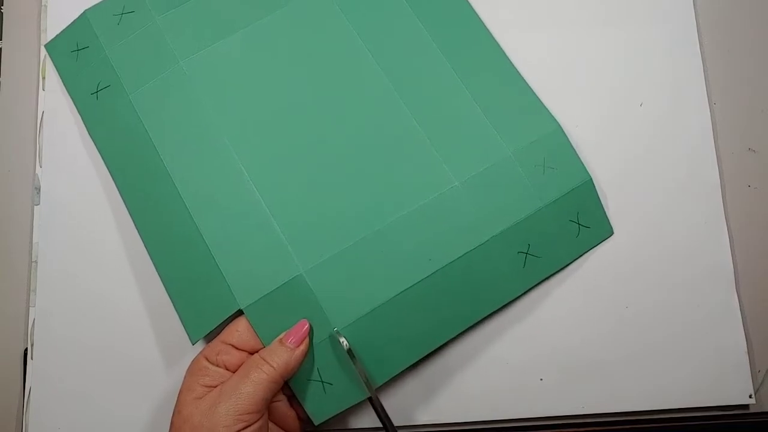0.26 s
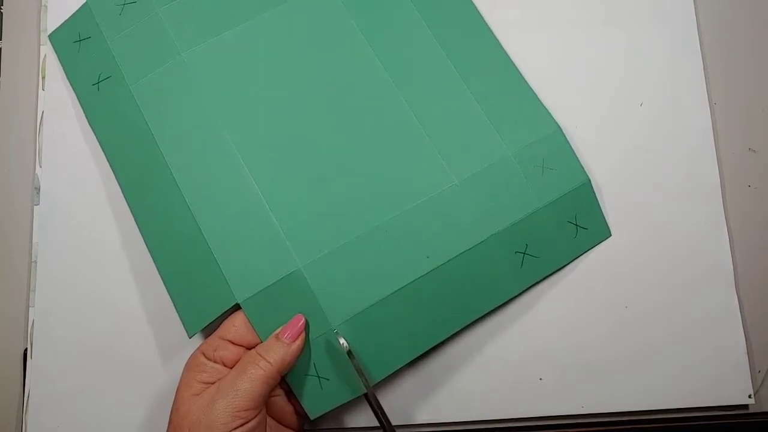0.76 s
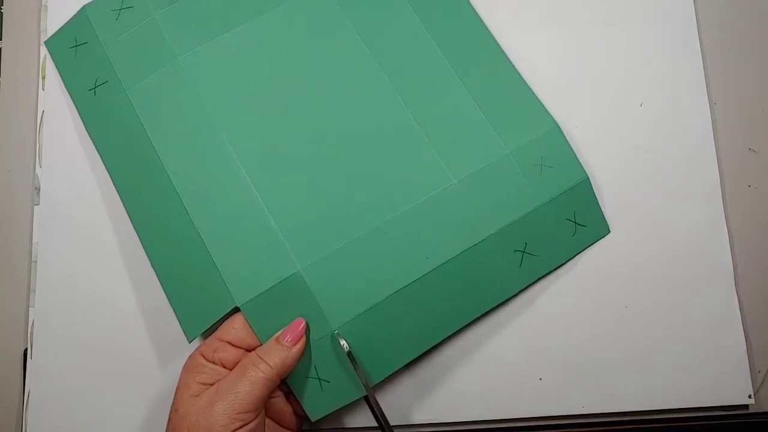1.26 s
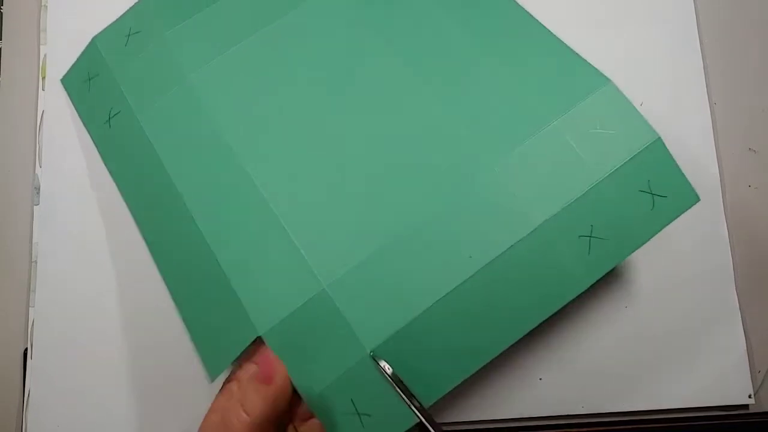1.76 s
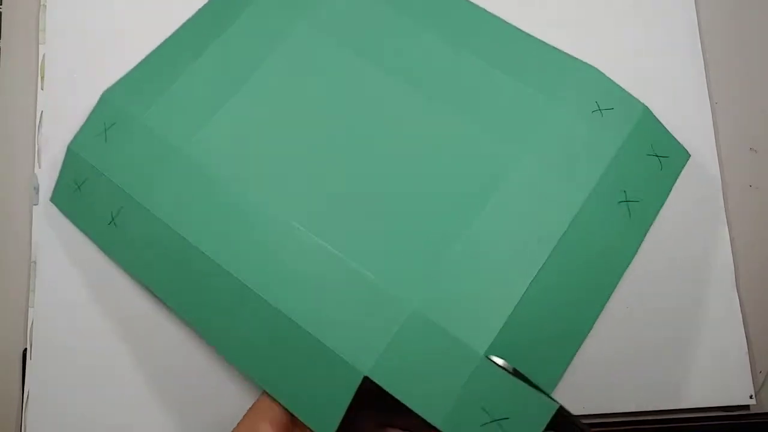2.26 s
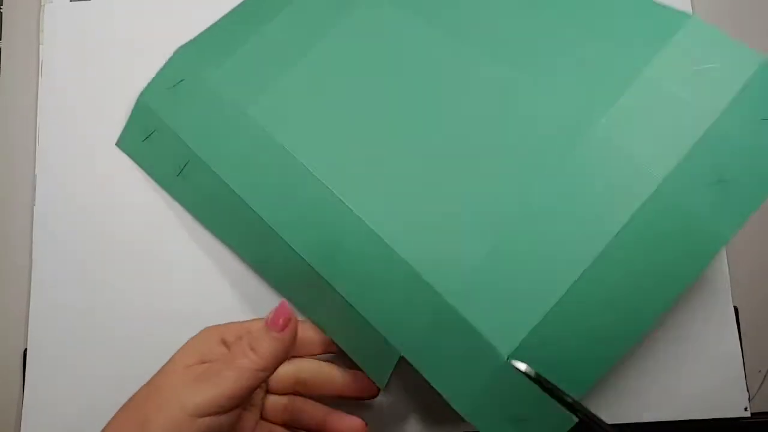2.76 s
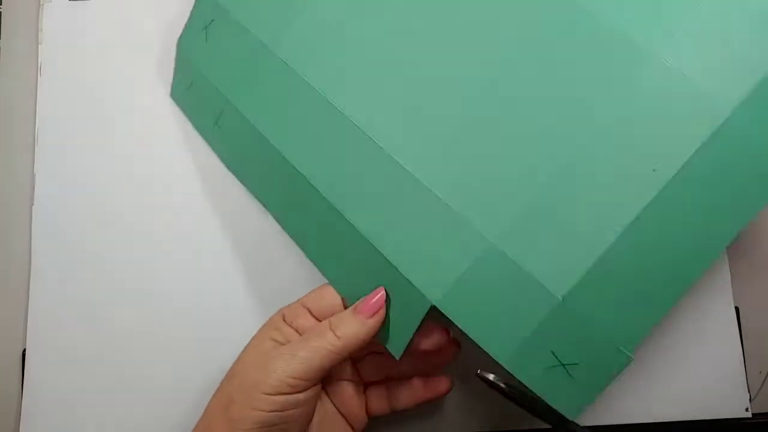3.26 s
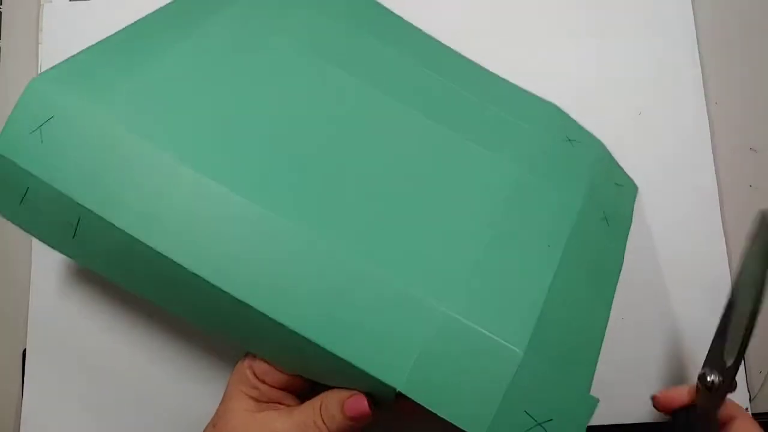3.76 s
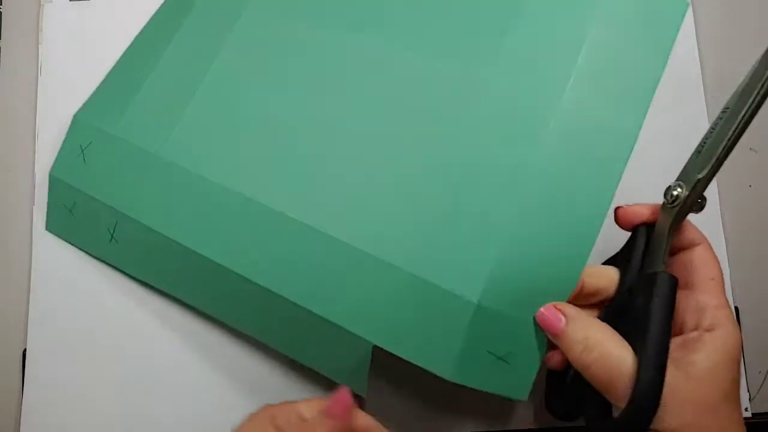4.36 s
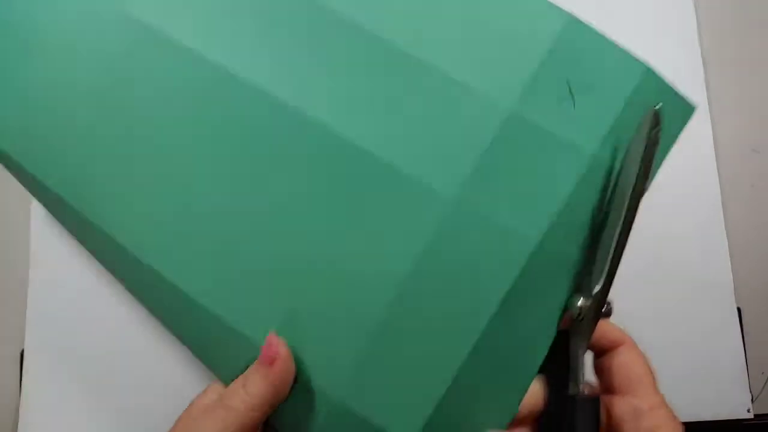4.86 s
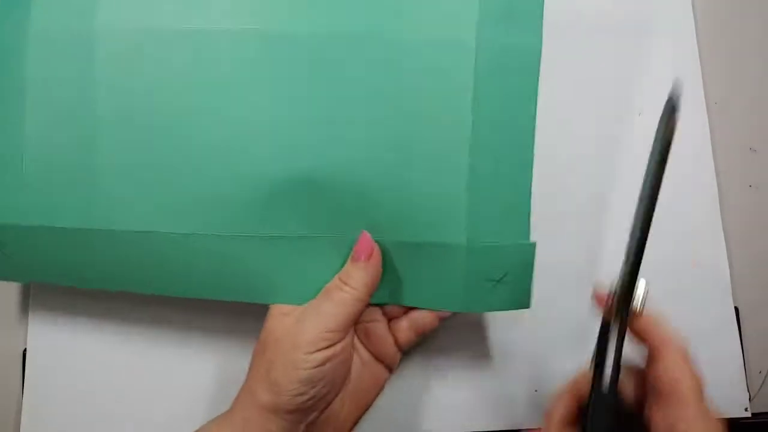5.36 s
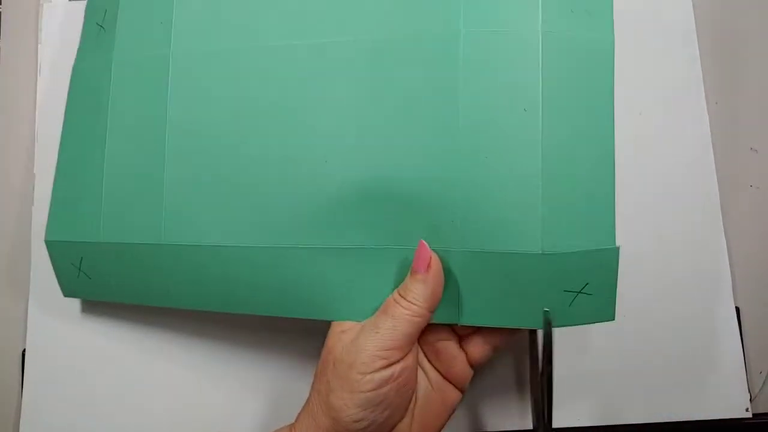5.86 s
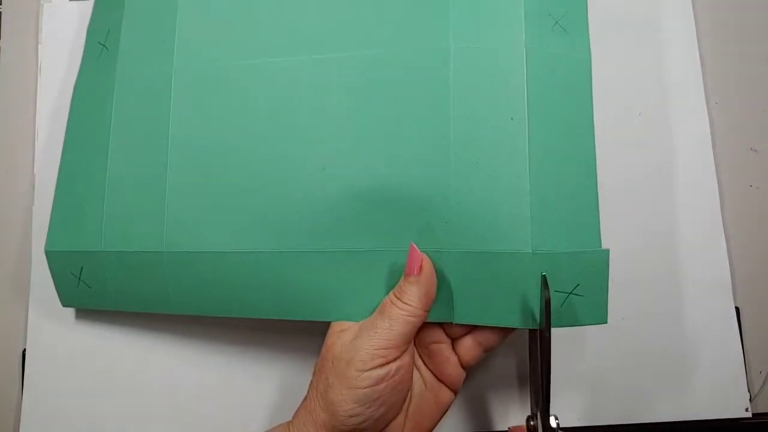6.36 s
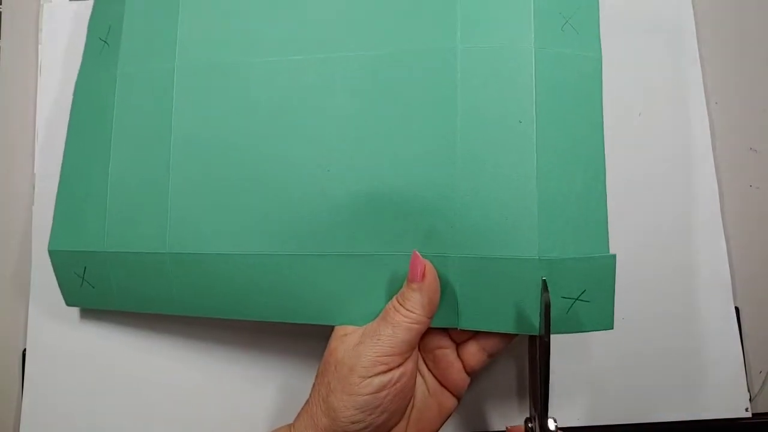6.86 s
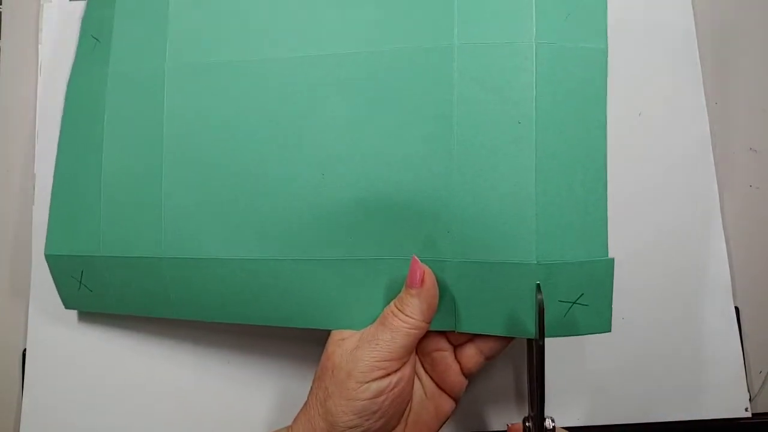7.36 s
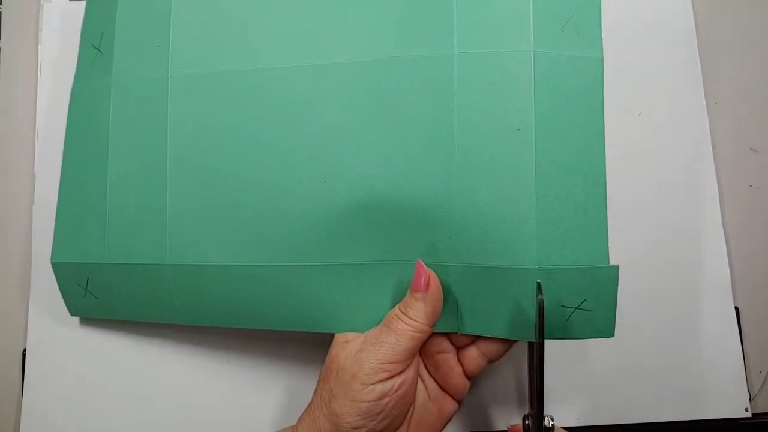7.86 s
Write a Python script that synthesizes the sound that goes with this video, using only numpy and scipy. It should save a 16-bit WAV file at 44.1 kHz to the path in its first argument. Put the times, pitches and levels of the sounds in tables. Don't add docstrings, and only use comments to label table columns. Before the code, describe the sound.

Close, bright handling of a stiff card sheet: rustles, scraping turns, crisp scissor snaps, light bumps on a table, then near quiet.

```python
import sys
import numpy as np
from scipy import signal
from scipy.fft import rfft, irfft
from scipy.io import wavfile
from scipy.ndimage import uniform_filter1d

SR = 44100
rng = np.random.default_rng(int(sys.argv[2]) if len(sys.argv) > 2 else 0)


def nominal_scale(level):
    x = np.asarray(level, float) / 20
    return 10 ** x


def file_out(sig):
    cols = np.atleast_2d(sig).T
    lim = np.clip(cols, -1, 1)
    pcm = np.round(lim * 32767).astype(np.int16)
    wavfile.write(sys.argv[1], SR, pcm)


N = 357651


def evened(x):
    return x / np.sqrt(np.mean(x ** 2) + 1e-20)


def add(mix, s, sound):
    part = mix[max(round(s * SR), 0):][:len(sound)]
    part += sound[:len(part)]


def coloured(x, points):
    f, db = np.transpose(points)
    hz = np.fft.rfftfreq(len(x), 1 / SR)
    curve_db = np.interp(np.log(hz + 1), np.log(f), db, -90, -90)
    return evened(irfft(rfft(x) * nominal_scale(curve_db), len(x)))


def resonate(x, hz, width_hz):
    turn = np.exp(2j * np.pi * np.cumsum(hz * np.ones(len(x))) / SR)
    r = np.exp(-np.pi * width_hz / SR)
    smooth = signal.lfilter([1 - r], [1, -r], x / turn)
    return 2 * (turn * smooth).real


def wander(per_s):
    r = np.exp(-2 * np.pi * per_s / SR)
    return evened(signal.lfilter([1], np.convolve([1, -r], [1, -r]), rng.standard_normal(N)))


def swell(rise, t60):
    rise, t60 = np.clip(rise, .0005, .08), np.clip(t60, .01, .5)
    t = np.arange(round((rise + t60) * SR)) / SR
    return np.sin(np.pi / 2 * np.minimum(t / rise, 1)) ** 2 * nominal_scale(-60 * np.maximum(t - rise, 0) / t60)


# start in seconds, tick level in dB, tick pitch in Hz,
# echo level in dB re tick, level of the knock in the sheet in dB re tick.
SNAPS = [(0.4933, -45.5, 7550, 2.5, -22), (.845, -30, 6240, -9, -25), (0.9036, -44, 6200, -14, -13),
         (1.3935, -5.5, 6100, -7.5, -20), (1.9665, -24.5, 7930, -17, -17), (3.1194, -24, 8250, -7, -24),
         (3.4157, -36, 6590, -3, -32), (3.4288, -10, 7900, -13.5, -49.5), (3.4442, -27, 4460, -3.5, -35),
         (3.4763, -32, 2500, -5, -24), (5.058, -35, 4440, -15, -27)]
# pitch in Hz, level in dB, t60 in seconds.
BLADE_MODES = [(3000, -26.5, 0.092), (4230, -19, 0.06), (5200, -10, 0.12), (6400, -13, 0.22),
               (6850, -14, 0.079), (7620, -9, 0.051), (8140, -3, 0.016), (8710, -17, 0.16),
               (10930, -36, 0.08), (11000, -33.5, 0.055), (11650, -18, 0.087)]
# delay in seconds, level in dB.
ECHOES = [(.0030, 0), (.0072, -3), (.0103, -8), (.0165, -11)]
RING_DB, RING_PER_DB = -20.5, 4


def snaps():
    out, t = np.zeros(N), np.arange(SR // 5) / SR
    for s, db, hz, echo_db, knock_db in SNAPS:
        tick = np.sin(2 * np.pi * hz * t) * nominal_scale(-60 * t / .003) * np.minimum(t / .0003, 1)
        torn = evened(resonate(rng.standard_normal(len(t)), hz, 4500))
        torn = torn * nominal_scale(echo_db - 8 - 60 * t / .03)
        knock = nominal_scale(knock_db - 60 * t / 0.012) * np.sin(2 * np.pi * 930 * t)
        ring = np.zeros(len(t))
        for mode_hz, mode_db, t60 in BLADE_MODES:
            ring_db = RING_DB + RING_PER_DB * db + mode_db - 60 * t / t60
            ring += nominal_scale(ring_db) * np.sin(2 * np.pi * mode_hz * t)
        add(out, s, nominal_scale(db) * (tick + torn + knock + ring))
        for delay, d in ECHOES:
            add(out, s + delay, nominal_scale(db + echo_db + d) * (tick + knock))
    return signal.lfilter(*signal.butter(2, np.array([550, 12000]) / (SR / 2), "band"), out)


# start in seconds, length in seconds, start pitch in Hz,
# end pitch in Hz, level in dB.
SQUEAKS = [(0.393, 0.14, 700, 730, -74), (0.405, 0.11, 1270, 1340, -77), (3.144, 0.026, 1064, 1300, -43),
           (3.157, 0.031, 1700, 1400, -53), (3.149, 0.011, 7950, 7900, -35.5),
           (3.16, 0.014, 7920, 7900, -41), (3.148, 0.018, 6650, 6640, -38.5),
           (3.14, 0.032, 13300, 12000, -49), (4.458, 0.031, 1600, 1830, -47),
           (4.462, 0.026, 3440, 3400, -51), (2.777, .04, 1800, 1790, -54), (5.36, 0.2, 700, 962, -72),
           (7.36, 0.13, 610, 620, -75), (7.489, 0.23, 385, 380, -73.5)]


def squeaks():
    out = np.zeros(N)
    for s, length, start_hz, end_hz, db in SQUEAKS:
        glide = np.linspace(start_hz, end_hz, round(length * SR))
        n = len(glide)
        wobble = 1 + 0.0126 * evened(uniform_filter1d(rng.standard_normal(SR), size=500))[:n]
        grip_db = 3 * evened(uniform_filter1d(rng.standard_normal(SR), size=400))[:n]
        tone = np.sin(2 * np.pi * np.cumsum(glide * wobble) / SR)
        add(out, s, nominal_scale(db + grip_db) * tone * signal.windows.tukey(n, .6))
    return out


# time in seconds, level in dB, pitch in Hz.
SLIDES = [
    [(4.235, -68, 6500), (4.25, -53, 6450), (4.35, -56, 6300), (4.42, -63, 6150), (4.62, -57, 5950),
     (4.76, -63, 6000), (4.9, -57, 6050), (5.05, -61, 6100)],
    [(4.845, -62, 2700), (4.86, -56, 2950), (4.91, -53, 3150), (4.925, -64, 3300)],
    [(1.4, -44, 5300), (1.44, -47, 5400), (1.51, -60, 5300)],
    [(3.14, -58, 1000), (3.165, -49, 1400), (3.19, -56, 2200)],
    [(7.68, -69, 1150), (7.8, -63.5, 1200), (7.89, -63, 1250), (7.91, -72, 1300)],
]
SLIDE_WIDTH_HZ = 790


def slides():
    out = np.zeros(N)
    for slide in SLIDES:
        s, db, hz = np.transpose(slide)
        t = np.arange(s[0], s[-1], 1 / SR)
        hz = np.interp(t, s, hz)
        band = rng.standard_normal(SR)[:len(t)]
        for _ in range(2):
            band = resonate(band, hz, SLIDE_WIDTH_HZ)
        add(out, s[0], nominal_scale(np.interp(t, s, db - 4.0)) * evened(band))
    return out


def fibres(grain_db=2.1, slip_db=.9, clump_db=.5, patchy_db=3.0):
    flicker_db = grain_db * wander(1070) + slip_db * wander(76) + clump_db * wander(28.5)
    z = signal.stft(rng.standard_normal(N) * nominal_scale(flicker_db), nperseg=512)[2]
    patches = uniform_filter1d(rng.standard_normal(z.shape), size=3, axis=0)
    patches = uniform_filter1d(patches, size=14, axis=1)
    return evened(signal.istft(z * nominal_scale(patchy_db * evened(patches)), nperseg=512)[1][:N])


# peak time in seconds, level in dB,
# sheet body in dB re level, body pitch in Hz.
NICKS = [(2.329, -55, 10.5, 1510), (1.322, -40, -10, 800), (0.694, -58, -2, 1000), (0.713, -60, -4, 3000),
         (6.462, -50, 0, 1200), (2.444, -67, 10, 1900), (2.896, -58, 7, 700), (3.89, -63, 4, 896),
         (4.01, -45, -4.5, 2920), (4.535, -38.5, -1, 3220), (4.99, -53, -1, 900), (4.472, -34, -9, 1500),
         (7.972, -44, -4, 1110), (7.999, -43.5, -5, 890)]
NICK_RISE_S, NICK_T60_S = 0.0073, 0.037
# peak time in seconds, level in dB,
# sheet body in dB re level, body pitch in Hz.
CATCHES = [(0.01, -43.5, -10, 1250), (1.319, -43, -13, 860), (1.372, -37.5, -26, 3000),
           (1.397, -24, -19.5, 3000), (2.461, -68, 16.5, 1170), (3.134, -43, -16, 2000),
           (3.18, -36.5, -9, 1740), (3.2805, -42, -23, 1160), (3.354, -56.5, 4, 1500),
           (3.39, -44, -2.5, 784), (3.438, -33, -7, 1380), (3.857, -47.5, -12.5, 3200),
           (4.852, -55, 3, 1190), (5.06, -32, -6, 1060), (5.227, -36, -12.5, 2960),
           (5.367, -49.5, -9, 1460), (5.886, -59, -1.5, 1000), (6.273, -63, -8, 2960), (6.46, -54, 0, 1500),
           (7.7267, -52, -6, 1010), (7.7544, -53.5, -9, 1040), (7.8302, -64, 3, 1010),
           (4.415, -45, -11, 1820)]
CATCH_RISE_S, CATCH_T60_S = 0.01, 0.12
# peak time in seconds, level in dB,
# sheet body in dB re level, body pitch in Hz.
DRAGS = [(0.2165, -58.5, -6, 1067), (0.697, -64, 0, 970), (0.9066, -57, -5, 995), (1.083, -64, -7, 1420),
         (1.3759, -44, -12, 3480), (1.5535, -47, -12.5, 3520), (1.754, -55.5, -2, 820),
         (1.886, -46.5, -9, 1450), (2.66, -47.5, -18, 2040), (3.108, -40, -7.5, 2500),
         (3.121, -31.5, -23, 3330), (3.3115, -53, -27, 2370), (3.5839, -46.5, -14, 3350),
         (3.734, -49.5, -13, 1470), (4.095, -46, -1.5, 1030), (5.1144, -45, -6, 1300),
         (5.612, -55, -12, 1680), (5.8507, -63, -21, 1870), (6.0313, -61, 0.5, 2950),
         (6.4633, -55.5, 1.5, 960), (3.423, -37.5, -11, 796), (7.84, -61.5, -1, 1100),
         (3.69, -57.5, -1, 1300), (8.105, -41, -10, 2800)]
DRAG_RISE_S, DRAG_T60_S = 0.019, 0.41
# peak time in seconds, level in dB,
# sheet body in dB re level, body pitch in Hz, t60 in seconds.
BRUSHES = [(1.1783, -59, -6, 3220, 0.19), (1.2581, -56, -9, 1400, 0.097), (1.6313, -43.5, -14.5, 1470, 0.2),
           (1.9665, -41.5, -2, 1400, 0.073), (2.212, -60, -1.5, 1770, 0.091), (2.6121, -52, -6, 1050, 0.24),
           (2.739, -56, 6, 880, 0.19), (2.787, -46, -6, 1700, 0.064), (2.9712, -42.5, -20, 1420, 0.05),
           (3.05, -38, -13.5, 2050, 0.11), (3.156, -33, -13, 1280, 0.18), (3.2574, -41.5, -15, 2420, 0.035),
           (3.645, -51, -4.5, 900, 0.54), (3.95, -49, -9, 2940, 0.094), (4.472, -29.5, -7, 1760, 0.065),
           (4.645, -42.5, -13, 1650, 0.28), (4.8969, -45.5, -1.5, 2650, 0.082),
           (6.142, -57.5, -0.5, 2820, 0.19), (6.8475, -61, -1.5, 840, 0.08), (7.6965, -59, -6, 1050, 0.065),
           (7.803, -52, -3.5, 870, 0.11), (8.026, -41.5, -9.5, 910, 0.05)]
BRUSH_RISE_S = 0.024
# peak time in seconds, level in dB,
# sheet body in dB re level, body pitch in Hz, rise in seconds.
SWEEPS = [(0.573, -55, -9, 1050, 0.092), (2.1516, -47, -8.5, 855, 0.039), (2.36, -44.5, -15.5, 2140, 0.077),
          (2.5412, -58.5, 5, 1090, 0.041), (2.9094, -45, -15.5, 1180, 0.089), (4.188, -41, -8, 1330, 0.029),
          (4.705, -37, -20, 1350, 0.034), (5.4716, -54, -22, 870, 0.083), (5.688, -47, -15.5, 2900, 0.081),
          (5.945, -56.5, -5, 1190, 0.08), (6.1041, -61, -4, 1210, 0.083), (6.2884, -47, 2, 3100, 0.034),
          (6.6848, -59, -2, 1000, 0.065), (6.7916, -54.5, -4.5, 1330, 0.038), (7.0859, -60, -4, 910, 0.032),
          (7.2206, -67, 1, 1110, 0.043), (7.4271, -59, -5, 1680, 0.1), (7.8741, -57, 0, 1210, 0.038)]
SWEEP_T60_PER_RISE = 3.57
# peak time in seconds, level in dB,
# sheet body in dB re level, body pitch in Hz.
BITES = [(3.044, -35, -16, 1800), (3.050, -33.5, -16, 2600), (3.110, -37, -16, 2500),
         (3.126, -32, -22, 3000), (3.132, -32, -22, 2600), (3.144, -27, -20, 1200), (3.153, -29, -22, 1200),
         (3.157, -25, -23, 3000), (3.164, -27, -20, 1500), (3.181, -33, -13, 1800), (3.387, -42, -10, 3000),
         (3.047, -34, -16, 5900), (7.726, -50, -8, 1100), (3.855, -48, -10, 3200), (1.318, -43.5, -3, 800),
         (3.218, -38, -16, 2400), (3.251, -40, -18, 2400), (3.256, -40, -17, 2000), (4.464, -31, -12, 3460),
         (5.073, -36, -8, 4300), (5.224, -36, -14, 4600), (2.33, -53, 6, 2540), (2.541, -58, 8, 850),
         (4.092, -41, -5, 1010), (4.19, -42, -8, 1000)]
BITE_RISE_S, BITE_T60_S = 0.0019, 0.025
# peak time in seconds, level in dB,
# sheet body in dB re level, body pitch in Hz, rise in seconds.
STOPS = [(2.802, -42, -5.5, 950, .05), (5.203, -36, -16, 1250, .03), (5.178, -41, -12, 1350, .03),
         (4.72, -34.5, -23, 1350, 0.028), (4.165, -44, -10, 1500, 0.037), (4.1, -42, -13, 1800, .03),
         (4.915, -46, -9, 2600, .04), (5.75, -49, -12, 2800, .06), (6.305, -52, 0, 1200, .03),
         (2.39, -45, -11, 2140, .05), (7.958, -49, -1.5, 1000, 0.019), (4.215, -47, -3.5, 1000, .03)]
STOP_T60_S = .05


def strokes():
    every = [(*row, NICK_RISE_S, NICK_T60_S) for row in NICKS]
    every += [(*row, CATCH_RISE_S, CATCH_T60_S) for row in CATCHES]
    every += [(*row, DRAG_RISE_S, DRAG_T60_S) for row in DRAGS]
    every += [(*row, BRUSH_RISE_S, t60) for *row, t60 in BRUSHES]
    every += [(*row, SWEEP_T60_PER_RISE * row[-1]) for row in SWEEPS]
    every += [(*row, BITE_RISE_S, BITE_T60_S) for row in BITES]
    every += [(*row, STOP_T60_S) for row in STOPS]
    return every


# time in seconds, rubbing pressure in dB, bending in dB.
RUB = [(0.0, -59.5, -67), (0.4, -69, -73.5), (1.2, -70.5, -74.5), (1.49, -54.5, -69), (1.76, -57, -63.5),
       (2.2, -65.5, -66), (2.53, -57.5, -61.5), (3.3, -58.5, -64), (3.45, -55, -67), (3.79, -62, -68),
       (4.22, -51, -54), (4.45, -50.5, -60.5), (5.1, -47, -58), (5.24, -56.5, -66.5), (5.4, -68, -70.5),
       (6.71, -68, -70.5), (6.9, -70, -73.5), (8.11, -67.5, -68.5)]
# frequency in Hz, level in dB per Hz.
FIBRE = [(4500, -42), (6000, -3), (8000, 7), (10000, -0.5), (12000, -5), (14500, -8)]
# frequency in Hz, level in dB per Hz.
GRIT = [(2600, -15.5), (3600, -8.5), (5200, -3), (6200, -7), (7500, -12.5)]
# frequency in Hz, level in dB per Hz.
BODY = [(400, -21.5), (700, -3), (1000, 2), (1700, 0), (2600, -2.5), (3500, -6), (5000, -26)]
# frequency in Hz, level in dB per Hz.
FLEX = [(60, -18), (110, 8.5), (200, -4.5), (350, 2.5), (600, -2.5), (900, -15.5)]
GRIT_RE_RUB_DB = -7.5
FLEX_AT_REST_DB, FLEX_PER_BEND = -74, 0.69


def sheet():
    s, rub_db, bend_db = np.transpose(RUB)
    flex_db = FLEX_AT_REST_DB + FLEX_PER_BEND * (bend_db + 72.5)
    levels = rub_db, rub_db + GRIT_RE_RUB_DB, bend_db, flex_db
    hiss, grit, body, flex = (nominal_scale(np.interp(np.arange(N) / SR, s, db)) ** 2 for db in levels)
    drive, tones = fibres(), np.zeros(N)
    for s, db, body_db, hz, rise, t60 in strokes():
        stroke, start = swell(rise, t60), max(s - rise, 0)
        add(hiss, start, (nominal_scale(db - 2.0) * stroke) ** 2)
        add(grit, start, (nominal_scale(db + 0.45 * body_db - 6) * stroke) ** 2)
        add(body, start, (nominal_scale(db + body_db - 2.5) * stroke) ** 2)
        piece = drive[round(start * SR):][:len(stroke)]
        patch = resonate(piece * stroke[:len(piece)], hz, 150 + 0.081 * hz)
        add(tones, start, nominal_scale(db + body_db + 4.5) * patch)
    layers = nominal_scale(-11) * np.sqrt(hiss) * coloured(drive, FIBRE)
    layers += nominal_scale(-4.5) * np.sqrt(body) * coloured(drive, BODY)
    layers += nominal_scale(-6.5) * np.sqrt(grit) * coloured(drive, GRIT)
    layers += nominal_scale(-7) * np.sqrt(flex) * coloured(drive, FLEX)
    return layers + tones


# peak time in seconds, level in dB, pitch in Hz, t60 in seconds.
BUMPS = [(1.322, -53.5, 712, 0.052), (1.3978, -54, 790, 0.02), (1.9695, -56.5, 590, 0.16),
         (2.1561, -55.5, 528, 0.085), (2.3313, -48, 736, 0.038), (2.4664, -54, 534, 0.18),
         (2.8988, -51, 368, 0.041), (3.061, -53.5, 310, 0.13), (3.071, -62, 124, 0.17),
         (3.36, -54.5, 260, 0.086), (3.2226, -46, 119, 0.13), (3.478, -54, 278, 0.052),
         (3.8927, -52.5, 570, 0.028), (4.0115, -61.5, 519, 0.58), (4.2194, -55, 586, 0.064),
         (4.48, -43, 380, 0.045), (4.543, -39.5, 327.6, 0.084), (4.542, -47, 146, 0.11),
         (4.5446, -37.5, 559, 0.044), (4.72, -52.5, 115, 0.34), (4.857, -45.5, 600, 0.1),
         (5.061, -50.5, 496, 0.25), (5.1444, -48, 87, 0.29), (5.2374, -49, 658, 0.044),
         (6.035, -64, 300, .08), (2.0, -66, 141, 0.16), (3.872, -57, 805, 0.032), (4.33, -58, 784, .12),
         (2.418, -55.5, 905, .04)]
BUMP_RISE_S = .013
# peak time in seconds, level in dB, pitch in Hz, t60 in seconds.
BUCKLES = [
    (2.7857, -54, 350, 0.21),
    (3.41, -48, 792, 0.08),
    (3.6597, -59, 792, 0.53),
    (4.7512, -54.5, 538, 0.2),
    (4.77, -53, 298, 0.094),
    (4.8885, -45, 546, 0.059),
    (5.0846, -48, 122, 0.17),
    (6.2977, -62, 607, 0.11),
]
BUCKLE_RISE_S = 0.038


def bumps():
    out = np.zeros(N)
    thuds = [(*row, BUMP_RISE_S) for row in BUMPS] + [(*row, BUCKLE_RISE_S) for row in BUCKLES]
    for s, db, hz, t60, rise in thuds:
        shape = swell(rise, t60)
        push = np.sin(2 * np.pi * hz * np.arange(len(shape)) / SR)
        puff = rng.standard_normal(SR)[:len(shape)]
        puff = evened(resonate(puff, 0.93 * hz, 0.64 * hz))
        add(out, s - rise, nominal_scale(db - 2.0) * shape * (0.52 * push + 0.64 * puff))
    return out


def room(x, t60=0.2):
    at = np.arange(400, SR // 2, 20)
    taps = np.zeros(SR // 2 + 20)
    signs = rng.choice([-1., 1.], len(at))
    taps[at + rng.integers(0, 20, len(at))] = signs * nominal_scale(-60 * at / SR / t60)
    return signal.fftconvolve(x, taps / np.linalg.norm(taps))[:N]


# frequency in Hz, level in dB per Hz.
AIR = [(25, -38), (44, -17.5), (65, 0.5), (95, -12), (150, -19), (600, -32.5), (1500, -26), (4000, -52),
       (8000, -41), (14500, -34.5)]
AIR_DB = -71


def air():
    return nominal_scale(AIR_DB + 1.2 * wander(3)) * coloured(rng.standard_normal(N), AIR)


def scene():
    near = snaps() + squeaks() + slides() + sheet() + bumps()
    return (near + nominal_scale(-12.0) * room(near) + air())[None]


def low_pass(x):
    return signal.sosfilt(signal.butter(12, 14200, fs=SR, output="sos"), x)


CAPSULE_HZ, CAPSULE_WIDTH_HZ, CAPSULE_DB = 7913, 712, 12.5
EDGE_HZ = 14050


def record(dry):
    picked = dry[0] + nominal_scale(CAPSULE_DB) * resonate(dry[0], CAPSULE_HZ, CAPSULE_WIDTH_HZ)
    lowpass = signal.firwin(255, EDGE_HZ, window=("kaiser", 9), fs=SR)
    limited = signal.oaconvolve(picked, lowpass, "same")
    return low_pass(limited[None])


dry = scene()
out = record(dry)
file_out(out)
```